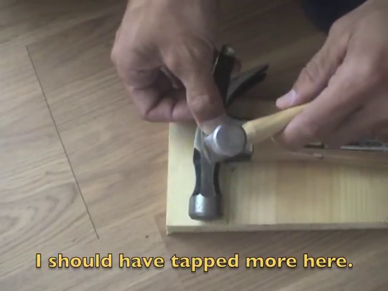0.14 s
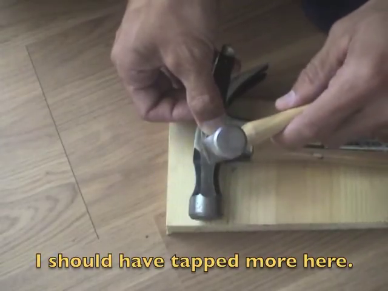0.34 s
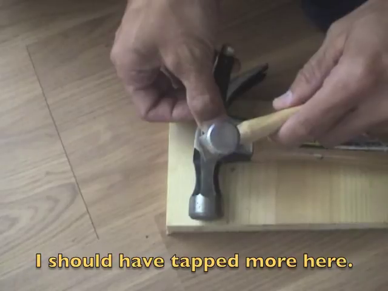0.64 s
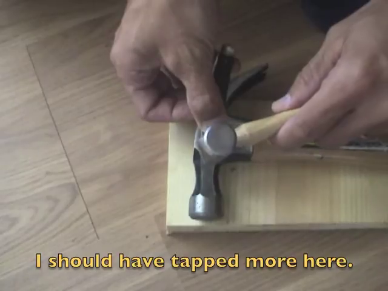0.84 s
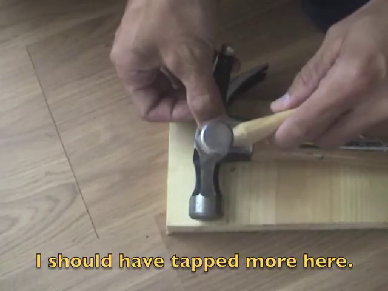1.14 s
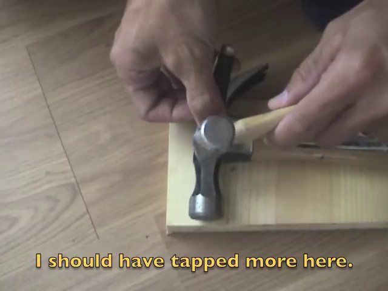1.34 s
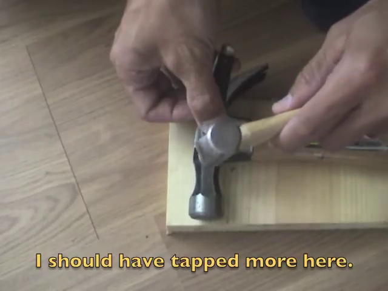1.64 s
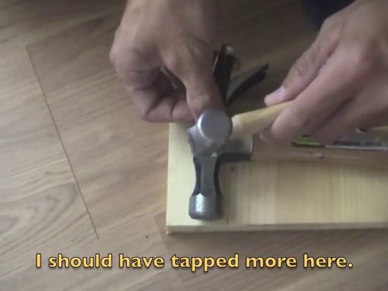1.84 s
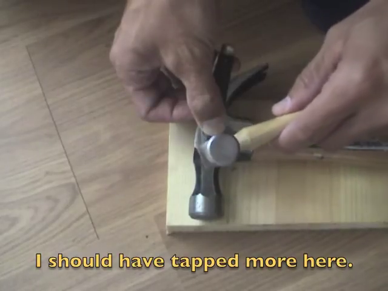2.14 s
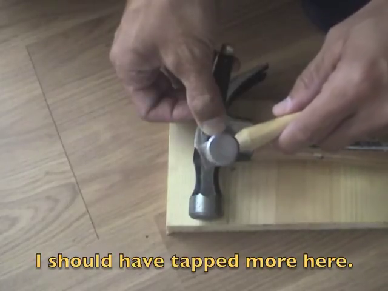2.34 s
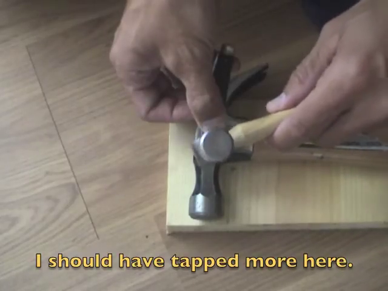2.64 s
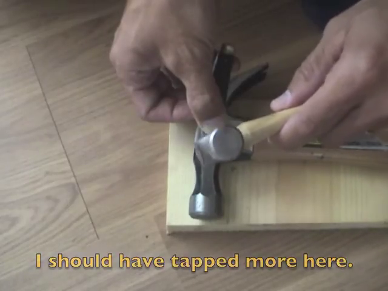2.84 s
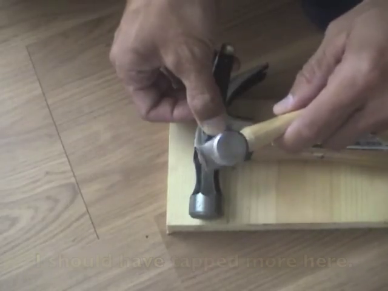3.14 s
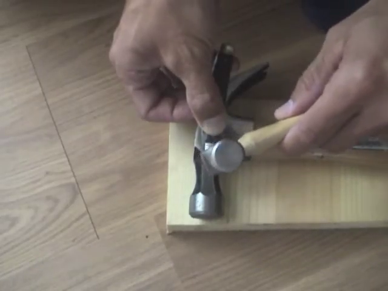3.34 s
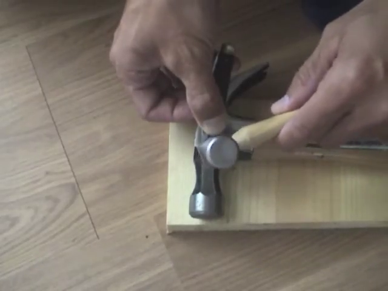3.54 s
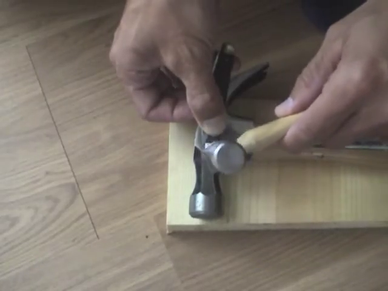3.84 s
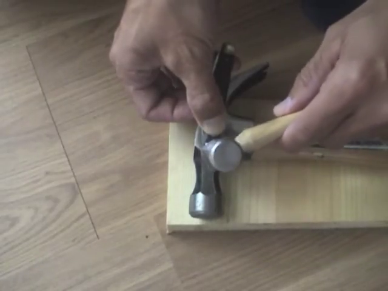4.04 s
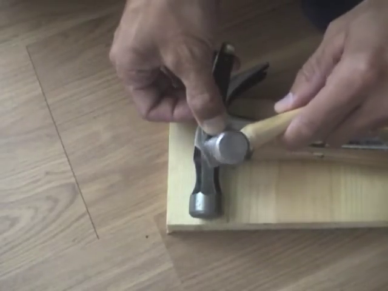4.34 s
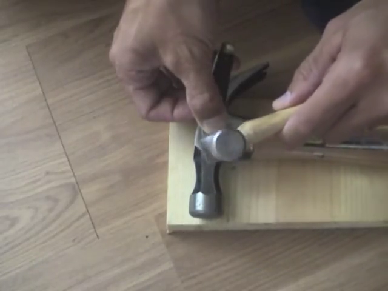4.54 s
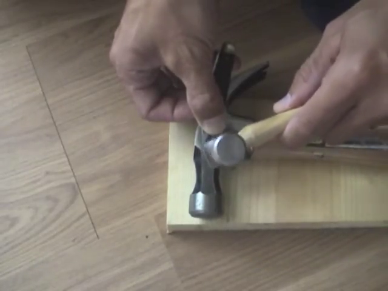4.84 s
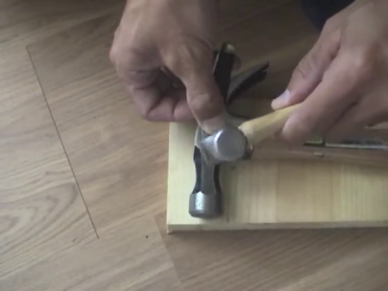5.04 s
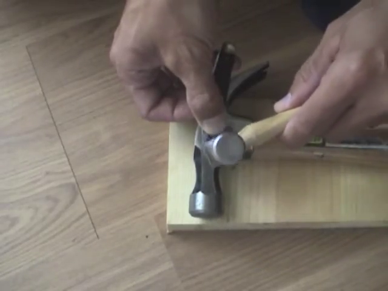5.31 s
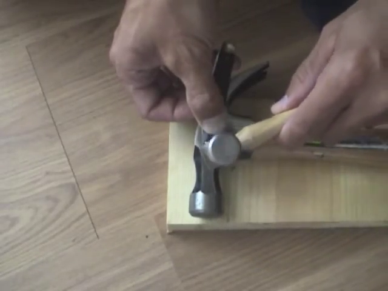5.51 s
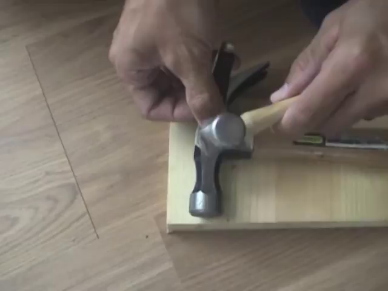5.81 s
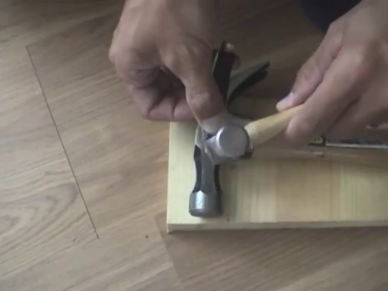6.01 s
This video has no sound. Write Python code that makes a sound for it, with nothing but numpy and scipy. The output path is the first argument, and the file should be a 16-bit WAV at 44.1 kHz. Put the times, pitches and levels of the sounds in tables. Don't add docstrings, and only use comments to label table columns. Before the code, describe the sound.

About a second and a half of hiss and thin motor whine, then a small hammer strikes a steel pin resting on a larger hammer head. The first blow is followed by tiny bouncing ticks, the second is softer, then firmer taps quicken to four or five a second. Each has a woody knock, short steel ring and loose chatter. Close camera microphone, small room, loud peaks limited and clipped.

```python
import sys
import numpy as np
from scipy import signal
from scipy.fft import rfft, irfft, next_fast_len
from scipy.io import wavfile
from scipy.ndimage import uniform_filter1d

SR = 44100
rng = np.random.default_rng(int(sys.argv[2]) if len(sys.argv) > 2 else 0)


def unload_audio(sound):
    columns = np.transpose(np.atleast_2d(sound))
    steps = np.round(np.clip(columns, -1, 1) * 32767)
    wavfile.write(sys.argv[1], SR, steps.astype(np.int16))


def to_linear_factor(level_db):
    exponent = np.asarray(level_db, float) / 20
    return 10 ** exponent


N = 272097
TAP_N = SR // 2
CIRCLE_HZ = abs(np.fft.fftfreq(1024, 1 / SR))


def evened(x):
    return x / np.sqrt(np.mean(x ** 2) + 1e-20)


def read(points, hz):
    f, value = np.transpose(points)
    return np.interp(np.log(hz + 1), np.log(f + 1), value)


def colour(x, points):
    size = next_fast_len(x.shape[-1] + 2048)
    gain = to_linear_factor(read(points, np.fft.rfftfreq(size, 1 / SR)))
    return irfft(rfft(x, size) * gain, size)[..., :x.shape[-1]]


def causal(db, size=1024):
    log_gain = np.log(to_linear_factor(db))
    phase = -signal.hilbert(log_gain).imag
    return np.fft.ifft(np.exp(log_gain + 1j * phase)).real[:size // 2]


def ring(hz, modes, spread_db, size=TAP_N):
    t = np.arange(size) / SR
    db, t60 = np.transpose(modes)[:, :, None]
    sense = (-1.) ** np.arange(len(modes))[:, None]
    decay = to_linear_factor(db + spread_db - 60 * t / t60)
    return (sense * decay * np.sin(2 * np.pi * np.outer(hz, t))).sum(0)


# f/Hz, level/dB per Hz
HISS = [(20, 8.5), (45, -44), (100, 3), (170, -6.5), (300, -9.5), (560, -12.5), (1000, -13.5), (2500, -22),
        (4500, -24), (5600, -17.5), (6400, -27), (8500, -29.5), (14500, -35.5), (16300, -54)]
# f/Hz, correlation/1
HISS_LIKENESS = [(60, 0.52), (180, 0.43), (550, -0.1), (1650, -0.51), (4970, 0.86), (15000, 0.053)]
# f/Hz, left minus right level/dB
HISS_LEAN = [(60, -7), (240, -3.5), (950, -1.5), (3770, -1), (15000, 0.5)]


def hiss():
    frames, hz = N // 256 + 5, np.fft.rfftfreq(1024, 1 / SR)
    a, b, c, d, patches = rng.standard_normal((frames, 513, 5)).T
    patches = evened(uniform_filter1d(uniform_filter1d(patches, 12, 0), 14, 1))
    same = np.clip(read(HISS_LIKENESS, hz), -1, 1)[:, None]
    left = a + 1j * b
    right = same * left + np.sqrt(1 - same ** 2) * (c + 1j * d)
    level_db = read(HISS, hz) + np.outer([.5, -.5], read(HISS_LEAN, hz))
    z = np.array([left, right]) * to_linear_factor(level_db[:, :, None] + 1.2 * patches)
    return to_linear_factor(-50.5) * evened(signal.istft(z, nperseg=1024, noverlap=768)[1][:, :N])


# f/Hz, level/dB
WHINE = [(4043, -80), (4495, -81), (5044, -80), (5460, -80), (5959, -78)]


def motor_whine():
    t = np.arange(N) / SR
    waver = np.cumsum(evened(uniform_filter1d(rng.standard_normal(N), 3000))) / SR
    lines = sum(to_linear_factor(db) * np.sin(2 * np.pi * hz * (t + 0.00057 * waver)) for hz, db in WHINE)
    return np.sqrt(2) * lines


def far_drone():
    t = np.arange(N) / SR
    beat_s, null_s = 0.763, 0.41
    beat = np.sin(np.pi * (t - null_s) / beat_s)
    drone = to_linear_factor(-61.5) * beat * np.sin(2 * np.pi * 567 * t)
    return np.sqrt(2) * drone * to_linear_factor([[-2.0], [1.5]])


# f/Hz, level/dB
CRACK = [(500, -56), (1500, -34.5), (2500, 3.5), (3700, 1), (4800, -0.5), (5700, 9), (6300, -4.5),
         (7200, 0), (8500, -7.5), (11000, 0), (14000, -10), (16000, -44), (20000, -57)]


def steel_click():
    return causal(read(CRACK, CIRCLE_HZ))


# t/s, peak level/dB
LANDINGS = [
    (1.5603, -24),
    (1.58, -22),
    (1.595, -30),
    (3.331, -16),
    (3.8587, -19),
    (4.5374, -30),
    (4.544, -27),
    (4.9507, -19),
    (5.8062, -8),
]
# middle t/s, peak level/dB
RATTLES = [
    (2.9225, -40),
    (3.2296, -38),
]


def blade_ticks():
    train = np.zeros(N)
    s, db = np.transpose(LANDINGS)
    train[(s * SR).astype(int)] = to_linear_factor(db + 7.5)
    rocks, rock_s = np.arange(-2, 3), .0141
    for middle, peak_db in RATTLES:
        at = ((middle + rock_s * rocks) * SR).astype(int)
        train[at] = to_linear_factor(peak_db + 3.5 - 0.5 * rocks ** 2)
    click = np.convolve(steel_click(), [.5, 1, .5])
    return signal.oaconvolve(train, click / abs(click).max())[:N]


BOARD_HZ = [78, 160, 212, 301, 371, 429, 592, 799, 881, 1152, 1282, 1720, 2350]
# level/dB, t60/s
BOARD = [(-6.5, 0.027), (1, 0.017), (1, 0.047), (-10, 0.075), (-9, 0.17), (-8, 0.088), (-2.5, 0.014),
         (1, 0.024), (1.5, 0.023), (-2.5, 0.02), (-7, 0.03), (-5.5, 0.013), (-9.5, 0.011)]
CLACKS = [0] * 11 + [.5, 1]


def board_knock(spot, clack_db):
    hz = BOARD_HZ * (1 + .012 * spot[1, :, 0])
    board = ring(hz, BOARD, 1.8 * spot[0] + clack_db * np.c_[CLACKS])
    push = np.hanning(12)
    return to_linear_factor(-3) * np.convolve(board, push / push.sum())[:TAP_N]


STEEL_HZ = [1568, 1590, 2835, 2870, 3183, 4358, 4822, 4877, 5628, 6853, 922]
# level/dB, t60/s
STEEL = [(5, 0.29), (4.5, 0.21), (7.5, 0.085), (-21.5, 0.65), (-2.5, 0.16), (2.5, 0.11), (-29, 0.092),
         (4, 0.067), (1.5, 0.076), (-4, 0.097), (-2, 0.3)]


def steel_ring(spot, bounce, clack_db, spread_db):
    upper = np.array(STEEL_HZ)[:, None] > 2000
    muffle_db = upper * 0.34 * clack_db
    steel = ring(STEEL_HZ, STEEL, 1.5 * spot[0, :len(STEEL)] - muffle_db)
    flutter = 1 + .3 * evened(uniform_filter1d(bounce, size=700))
    return steel * to_linear_factor(-23 + 0.87 * spread_db) * flutter


PIN_HZ = [5250, 4400, 4830, 5700, 6900, 7250, 9000, 11000]
# level/dB, t60/s
PIN = [(0, 0.014), (-4, 0.004), (-9.5, 0.027), (1.5, 0.0051), (-0.5, 0.0052), (0.5, 0.011), (-11.5, 0.0087),
       (-17, 0.014)]


def pin_ping(spot, size):
    hz = PIN_HZ * (1 + .015 * spot[1, :len(PIN), 0])
    return to_linear_factor(-13.0) * ring(hz, PIN, 2.0 * spot[0, -len(PIN):], size=size)


def loose_chatter(grit, bounce, clack_db, spread_db):
    t = np.arange(TAP_N) / SR
    loose = abs(bounce) > 1.5
    return loose * grit * to_linear_factor(spread_db + 0.57 * clack_db - 35 - 193 * t)


def steel_touch(grit, chatter, db, crack_db):
    contact = grit * to_linear_factor(-60 * np.arange(TAP_N) / SR / .004) * .3
    contact[8] = -2.5
    touch = to_linear_factor(crack_db + 9.0) * (contact + 4 * np.convolve(chatter, [.4, .8, .4], "same"))
    dull = np.clip(-0.09 * db, 0, .5)
    return np.convolve(touch, [dull, 1 - dull, dull], "same")


# t/s, blow level/dB, crack level over the blow/dB, dull clack of the pin level/dB,
# squareness level/dB (what spreads through floor and room)
TAPS = [(1.56, 0.5, -14.5, 0.5, -3.5), (2.253, -6, -18, -9, -7.5), (2.739, 2, -15, 3.5, -2),
        (3.032, 2, -15.5, 3.5, 0.5), (3.311, 3.5, -19.5, 2, -3), (3.606, 1.5, -16, 5, -1),
        (3.842, 2.5, -20, 4, -2.5), (4.072, 2.5, -21.5, 7, -1), (4.301, 3, -22, 3, -2.5),
        (4.522, 1.5, -17.5, 5.5, 1.5), (4.741, 3, -20.5, 5, -1.5), (4.933, 2, -20, 6, -0.5),
        (5.15, 0.5, -17, 5.5, 1.5), (5.357, 2.5, -22, 5.5, -4), (5.558, 1, -18, 7.5, 3),
        (5.792, 2.5, -18, 9, -1.5), (5.988, 2, -21, 5.5, -3)]


def taps():
    out = np.zeros((2, N + SR))
    click = steel_click()
    spots = rng.standard_normal((len(TAPS), 2, len(BOARD), 1))
    chance = rng.standard_normal((len(TAPS), 2, TAP_N))
    for (s, db, crack_db, clack_db, spread_db), spot, (grit, bounce) in zip(TAPS, spots, chance):
        knock = board_knock(spot, clack_db)
        steel = steel_ring(spot, bounce, clack_db, spread_db)
        chatter = loose_chatter(grit, bounce, clack_db, spread_db)
        touch = steel_touch(grit, chatter, db, crack_db)
        crack = signal.oaconvolve(touch, click / abs(click).max())[:TAP_N]
        ping = signal.oaconvolve(touch, pin_ping(spot, len(click)))[:TAP_N]
        steel += signal.fftconvolve(to_linear_factor(-50) * chatter, steel)[:TAP_N]
        knock += signal.fftconvolve(to_linear_factor(-9.5) * chatter, knock)[:TAP_N]
        direct = knock + crack + ping + steel
        spread = knock + to_linear_factor(0.33 * clack_db) * crack + .5 * ping + to_linear_factor(-2) * steel
        at = round((s + .0006) * SR)
        out[:, at:][:, :TAP_N] += to_linear_factor(db) * np.array([direct, to_linear_factor(spread_db) * spread])
    return out[:, :N]


# f/Hz, t60/s
ROOM_T60 = [(80, 0.65), (200, 0.29), (500, 0.38), (1500, 0.41), (4000, 0.35), (8000, 0.4), (13000, 0.15)]
# f/Hz, level/dB
ROOM_COLOUR = [(60, 1), (200, 4), (500, 4), (1200, -2.5), (2500, -2), (5000, -3.5), (9000, -20),
               (14000, -64)]
# f/Hz, side level/dB
ROOM_WIDTH = [(60, -4.5), (300, -36), (1000, -22.5), (2500, -6.5), (5000, -23), (9000, 1), (14000, 39)]


def room(x):
    echoes = np.zeros((2, SR))
    at = np.arange(130, SR - 12, 12)
    at = at + rng.integers(0, 12, (2, len(at)))
    np.put_along_axis(echoes, at, rng.choice([-1., 1.], at.shape), 1)
    hz, t, z = signal.stft(echoes, SR, nperseg=512)
    decay = to_linear_factor(-60 * t / read(ROOM_T60, hz)[:, None])
    tail = signal.istft(z * decay, SR, nperseg=512)[1][:, :SR]
    tail *= 1 - np.exp(-np.arange(SR) / SR / 0.0024)
    tail = tail / np.linalg.norm(tail[0])
    turn = 2 * np.pi * np.arange(N) / SR / 3.1
    feed = colour(x, ROOM_COLOUR) * np.array([np.cos(turn), np.sin(turn)])
    tails = np.array([tail, tail[::-1] * [[1], [-1]]])
    mid, side = signal.fftconvolve(feed[None], tails, axes=2)[..., :N].sum(1)
    side = colour(side, ROOM_WIDTH)
    return np.array([mid + side, mid - side])


# f/Hz, left minus right level/dB
LEAN = [(60, -1.5), (300, -3), (1500, -3), (3000, -2), (5500, 0), (9000, 2), (14000, -1.5)]


def scene():
    background = hiss() + motor_whine() + far_drone()
    direct, spread = blade_ticks() + taps()
    lean = np.array([causal(side * read(LEAN, CIRCLE_HZ) / 2) for side in (1, -1)])
    return signal.fftconvolve(direct + room(spread), lean, axes=1)[:, :N] + background


def top_cut(x):
    return signal.sosfilt(signal.butter(12, 16320, fs=SR, output="sos"), x)


def record(dry):
    keep = np.exp(-1 / (.0025 * SR))
    power = signal.lfilter([1 - keep], [1, -keep], (dry ** 2).mean(0))
    power_db = 10 * np.log10(power + 1e-12)
    fall = np.arange(N) * 94.5 / SR
    held_db = np.maximum.accumulate(power_db + fall) - fall
    over_db = np.maximum(held_db + 14, 0)
    limited = dry / to_linear_factor(0.46 * signal.lfilter([1 - keep], [1, -keep], over_db))
    low_cut = signal.butter(3, 60, "high", fs=SR)
    clipped = np.clip(signal.lfilter(*low_cut, limited), -1, 1)
    smooth = signal.oaconvolve(clipped, signal.firwin(25, 16000, fs=SR)[None], "same")
    return top_cut(smooth)


dry = scene()
out = record(dry)
unload_audio(out)
```